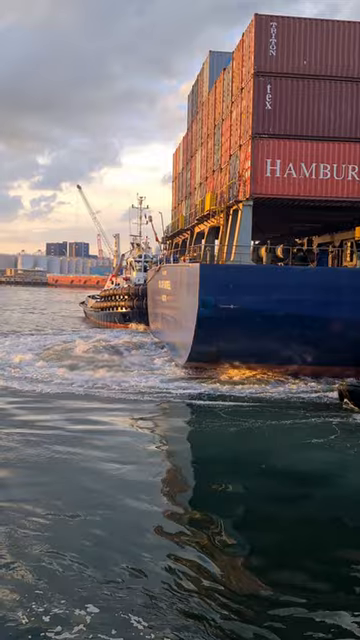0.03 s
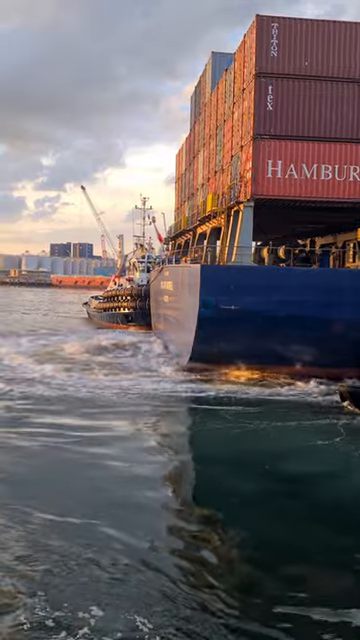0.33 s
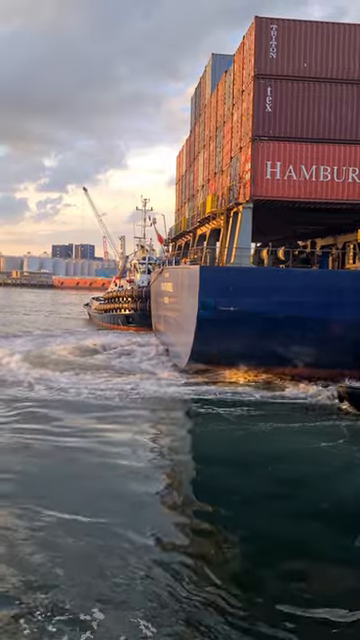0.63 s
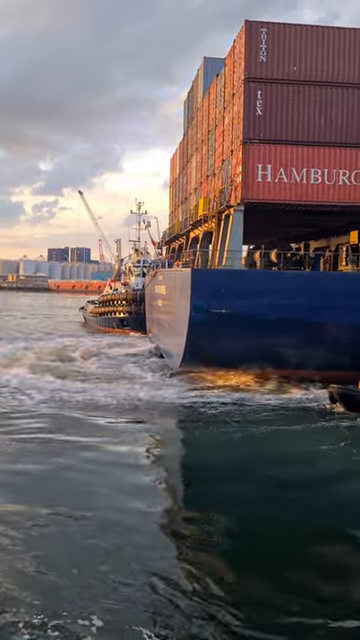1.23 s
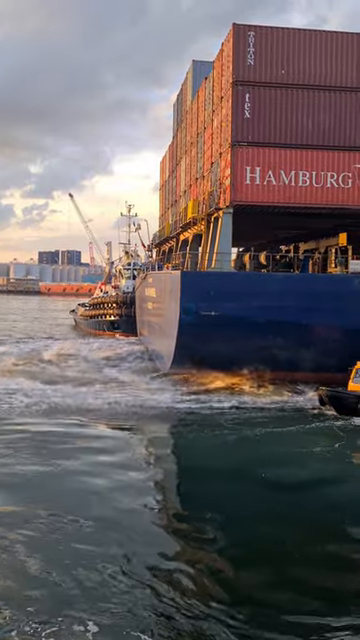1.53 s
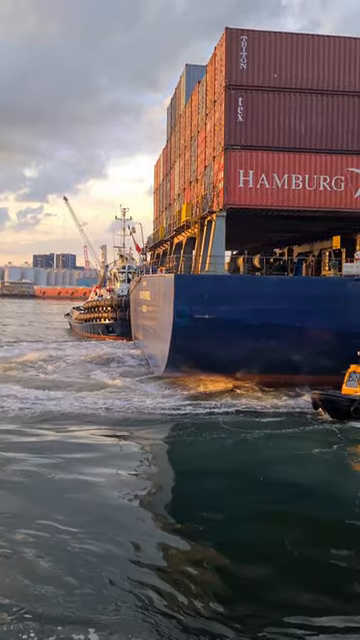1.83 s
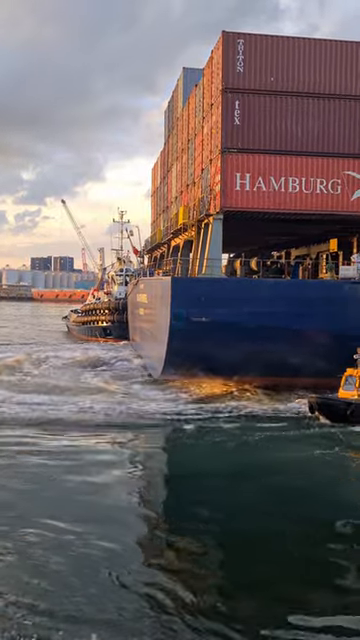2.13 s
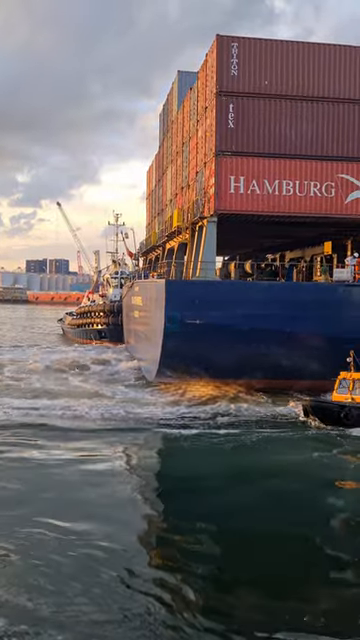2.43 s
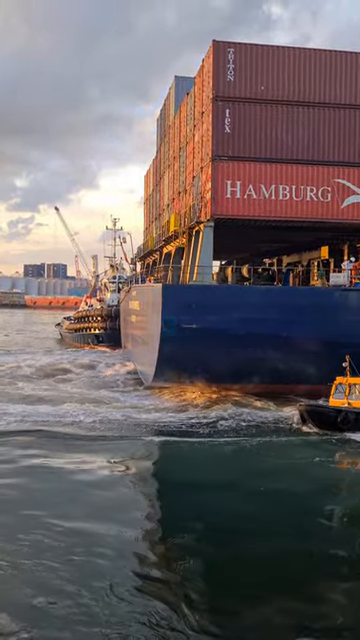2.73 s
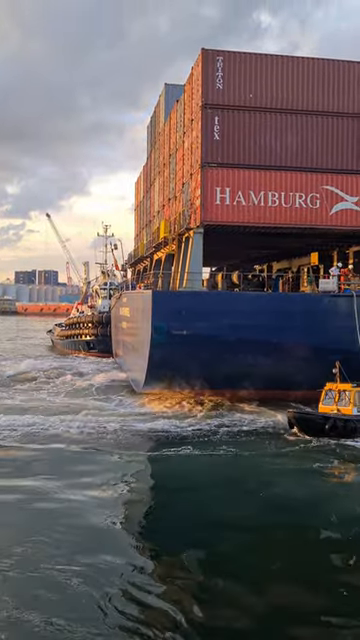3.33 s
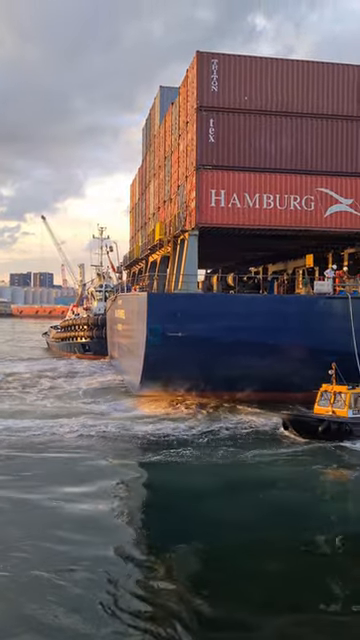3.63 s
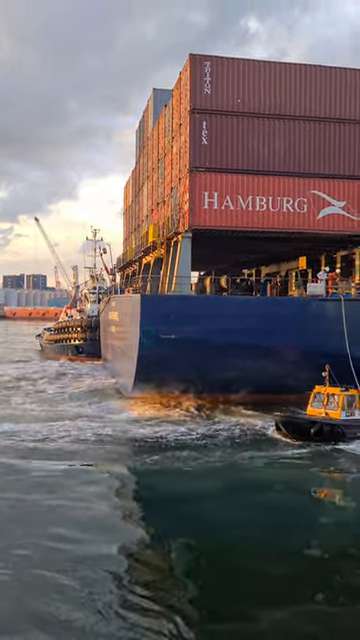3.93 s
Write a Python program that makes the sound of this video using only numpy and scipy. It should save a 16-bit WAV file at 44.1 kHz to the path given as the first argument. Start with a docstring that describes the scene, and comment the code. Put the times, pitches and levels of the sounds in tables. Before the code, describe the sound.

A deep, pulsing rumble of tug and container ship engines carries over open water, along with a whine and churning foam. One distant metallic clank rings out before the middle, and faint squeaks come and go.

```python
"""Two ship diesels throb across a harbour basin as a tug manoeuvres a container ship.
Running at different speeds, they beat against each other over a deep rumble, heavy exhaust
thuds and a machine whine. The propeller wash roars and fizzes with foam, crests and droplets.
In the distance steel strikes steel once and rings on, and a few faint squeaks carry over."""
import sys
import numpy as np
from scipy import signal
from scipy.fft import rfft, irfft
from scipy.io import wavfile

SR = 44100
rng = np.random.default_rng(int(sys.argv[2]) if len(sys.argv) > 2 else 0)


def unload_audio(sound):
    """Save the sound as a 16-bit wav file, at the path given as the first command line argument."""
    columns = np.transpose(np.atleast_2d(sound))
    # keep every value between -1 and 1, then stretch to whole-number steps
    steps = np.round(np.clip(columns, -1, 1) * 32767)
    wavfile.write(sys.argv[1], SR, steps.astype(np.int16))


N = 176400
T = np.arange(N) / SR
HZ = np.maximum(np.arange(N // 2 + 1) * SR / N, 1)
SLOW_CYCLE_HZ, FAST_CYCLE_HZ = 6.006, 7.51  # working cycles of the two diesels


def diesels():
    """The exhausts of two engines drift in and out of step."""
    # exhaust harmonics of each engine: multiple of the cycle rate, level/dB
    slow_orders = [(5, -42), (6, -43), (10, -29.5), (11, -37.5), (14, -34), (15, -39.5), (16, -35.5),
                   (17, -49), (20, -46), (21, -46), (23, -49.5), (24, -41.5), (26, -60), (32, -46.5)]
    fast_orders = [(7, -45), (9, -40), (10, -40.5), (11, -37), (17, -39.5), (20, -46), (23, -46.5),
                   (25, -52.5), (26, -50), (35, -46), (36, -57), (42, -46), (44, -45.5), (45, -55),
                   (51, -58), (53, -52.5), (54, -48), (55, -47.5)]
    slow = exhaust(SLOW_CYCLE_HZ, slow_orders, stroke_s=3.1995)
    return slow + exhaust(FAST_CYCLE_HZ, fast_orders, stroke_s=3.2005)


def exhaust(cycle_hz, orders, stroke_s):
    """Harmonics gather into one thump per cycle, one of them at stroke_s; high ones line up loosely."""
    return sum(tone(k * cycle_hz, db, align_s=stroke_s, smear_rad=.005 * k * cycle_hz)
               for k, db in orders)


def clatter(firings_per_cycle=9, depth=.74):
    """Engine noise pulses with the firings of both diesels."""
    # clatter spectrum: f/Hz, level/dB
    colour = [(15, -110), (150, -67), (300, -76.5), (450, -63.5), (700, -75.5), (1100, -96), (2500, -88),
              (5000, -110), (16000, -130)]
    # its swells and dips: t/s, level/dB
    ride = [(.15, 2), (.6, 2.5), (.9, 3), (1.15, -9), (1.7, 5), (2.2, -3), (2.55, -1), (2.9, 4.5),
            (3.3, -6), (3.7, -9), (4, 3)]
    firing = sum(np.cos(2 * np.pi * firings_per_cycle * hz * T) for hz in (SLOW_CYCLE_HZ, FAST_CYCLE_HZ))
    return noise(at_hz(colour)) * np.exp(depth * (firing - 1)) * from_db(over_time(ride))


def thuds(boom_hz=55):
    """A heavy stroke makes the exhaust boom for a few cycles."""
    # heavy strokes: t/s, half-width/s, level/dB
    strokes = [(0.2, .035, -24), (0.535, 0.01, -23), (0.698, 0.028, -20), (1.656, 0.018, -19),
               (1.866, 0.018, -20), (2.401, .018, -20), (2.539, 0.015, -25), (3.07, 0.037, -23),
               (3.195, 0.028, -16.5), (3.329, .032, -19), (3.537, 0.018, -18), (3.733, .025, -30)]
    return sum(-from_db(db) * swell(s, width) * np.cos(2 * np.pi * boom_hz * (T - s))
               for s, width, db in strokes)


def hums():
    """Other machinery hums; the lowest four tones beat into a deep throb."""
    # machinery tones: f/Hz, level/dB
    tones = [(51.2, -33.5), (52.8, -31), (53.7, -37.5), (54.8, -38.5), (118.6, -45.5), (148.5, -47),
             (205.6, -43.5)]
    # swell of the rumble, weaker on tones above 60 Hz: t/s, level/dB
    ride = [(.15, 2.5), (.65, -3), (1.1, -5), (1.5, 4), (2, -8), (2.4, 0), (2.85, -3), (3.25, -3),
            (3.6, 3.5), (4, -10)]
    return sum(tone(hz, db + over_time(ride) * min(1, 60 / hz)) for hz, db in tones)


def whine(pitch_hz=270.08):
    """Harmonics of a fast-turning machine; the higher ones flutter more."""
    # harmonics: multiple, level/dB, left minus right/dB
    harmonics = [(1, -60, 12), (2, -43.5, 0), (3, -50, -13), (4, -53.5, 14), (5, -56.5, -5), (6, -60, 3),
                 (7, -64, -9), (9, -62, 10)]
    # two of them fade as the paths over the water change: multiple -> t/s, level/dB
    fades = {2: [(.15, -2), (.38, 8), (.6, -4.5), (1, 3), (1.5, 2), (2.05, 6.5), (2.5, 2), (2.7, 0.5),
             (3.1, 1), (3.35, -10), (3.75, 4.5), (4, 0.5)], 3: [(.15, 9.5), (.62, 8.5), (.9, 1), (1.3, -2),
             (2.3, -6), (2.8, 2), (3.4, -6), (3.8, 4.5)]}
    out = 0
    for k, db, pan in harmonics:
        fade_db = over_time(fades[k]) if k in fades else 0
        flutter_db = 1.3 * np.sqrt(k) * drift(13)
        out += panned(pan) * tone(k * pitch_hz, db + fade_db + flutter_db, waver_db=1, waver_rad=.27)
    return out


def roar():
    """Water churned by the propeller roars along with the exhaust rumble."""
    # roar spectrum: f/Hz, level/dB
    colour = [(15, -34.5), (21, -79), (26, -50), (33, -65), (41, -62), (46, -62), (53, -45.5), (62, -52),
              (70, -40), (80, -50.5), (110, -46.5), (130, -54), (200, -53), (235, -56), (275, -53.5),
              (300, -57.5), (330, -55.5), (365, -63.5), (410, -56), (500, -69.5), (560, -64.5),
              (605, -72.5), (650, -66.5), (720, -67.5), (880, -72), (1080, -67.5), (1250, -74.5),
              (1400, -72.5), (2000, -78.5), (2600, -81), (3150, -81), (3900, -97.5), (6000, -104),
              (16000, -125)]
    # its gentle heave: t/s, level/dB
    ride = [(.15, 0.9), (.7, 0.5), (1.2, -.3), (1.7, -0.2), (2.3, 0.2), (2.75, -0.6), (3.1, 0.5), (3.5, 0),
            (4, -.5)]
    return noise(at_hz(colour), patchy_db=1) * from_db(over_time(ride) + .5 * drift(1.7))


def foam():
    """Foam hisses on the wash, easing off unevenly."""
    # hiss spectrum: f/Hz, level/dB
    colour = [(15, -125), (1000, -107), (2000, -84), (2600, -78), (3200, -81), (4000, -85.5), (5000, -90),
              (6100, -89.5), (7900, -100), (9100, -100), (11900, -93), (13200, -94), (15500, -96.5)]
    # its ebb: t/s, level/dB
    ride = [(.15, 0.5), (.45, -1.5), (.75, -0.5), (1, -3), (1.37, 0.5), (1.58, -2), (2.1, -2.5),
            (2.5, -2.5), (3.4, -4.5), (4, -4)]
    return noise(at_hz(colour), patchy_db=.35) * from_db(over_time(ride))


def crests(band_hz=570):
    """Each breaking crest is a short, grainy surge of spray."""
    # small crests of the wash: t/s, half-width/s, f/Hz, level/dB
    breaks = [(.82, .05, 3100, -48), (1.22, .05, 2900, -48), (1.38, .08, 3100, -48),
              (1.735, .04, 3000, -48), (2.88, .018, 1900, -46), (3.35, .05, 2700, -51),
              (3.81, .05, 3050, -47)]
    grain = from_db(1.5 * drift(100))
    return grain * sum(swell(s, width) * ringing([(hz, band_hz, db)]) for s, width, hz, db in breaks)


def splashes(per_s=110, pitches=14, ring_cycles=17, level_db=-58.5):
    """Small bubbles and droplets ring for a few cycles each."""
    out = np.zeros((2, N))
    for hz in np.geomspace(900, 6000, pitches):
        onsets = rng.random(N) < per_s / pitches / SR
        clicks = onsets * from_db(6 * np.minimum(rng.exponential(1, N), 4))
        r = from_db(-60 * hz / (ring_cycles * SR))  # decay per sample
        w = 2 * np.pi * hz / SR
        plinks = signal.lfilter([np.sin(w) / np.sqrt(hz)], [1, -2 * r * np.cos(w), r * r], clicks + 1e-18)
        out += panned(rng.normal(0, 5.7)) * plinks
    return from_db(level_db) * out / out.std()


def clank(attack_s=.0015, echo_db=-16.5, echo_s=.049, tail_rise_s=.021, tail_decay_s=.12):
    """Steel strikes steel in a quick run of hard contacts, smeared by echoes; the steel rings on."""
    # contacts: t/s, level/dB, decay/s, brightness/(dB per octave)
    contacts = [(1.596, -11, .008, -.3), (1.604, -7, .007, -1.5), (1.614, 3, .005, -2.2),
                (1.62, 1.5, .0035, -.5), (1.6335, 1.5, .009, .7), (1.657, -8, .005, .3)]
    # impact spectrum: f/Hz, level/dB
    colour = [(15, -96), (300, -62), (700, -56.5), (1000, -55), (1500, -67.5), (2000, -68.5), (2600, -65.5),
              (3400, -70), (4200, -73.5), (6000, -84.5), (9000, -89.5), (13000, -92), (16000, -87)]
    # steel resonances in the strike and in the tail: f/Hz, width/Hz, level/dB
    strike_modes = [(1035, 130, -34), (1380, 27, -38), (1980, 70, -38), (3240, 170, -37.5), (6400, 54, -62)]
    tail_modes = [(695, 61, -38.5), (824, 33, -42), (1077, 44, -40), (1446, 30, -47), (2350, 36, -47)]
    out = 0
    for s, db, decay, tilt in contacts:
        age = np.maximum(T - s, 0)
        rise = np.minimum(age / attack_s, 1)
        fall = np.exp(-age / decay) + from_db(echo_db) * np.exp(-age / echo_s)
        steel = noise(at_hz(colour) + tilt * np.log2(HZ / 1500)) + ringing(strike_modes)
        out += from_db(db) * rise * fall * steel
    age = np.maximum(T - contacts[0][0], 0)
    tail = np.minimum(age / tail_rise_s, np.exp((tail_rise_s - age) / tail_decay_s))
    return out + tail * ringing(tail_modes)


def squeaks(sag_per_s=.3):
    """Short rough tones far off swell, sag in pitch and fade."""
    # squeaks and groans: t/s, half-width/s, f/Hz, level/dB, left minus right/dB
    cues = [(.23, .04, 645, -44, 0), (1.14, .07, 935, -46, 0), (2.15, .06, 1080, -42, 4),
            (2.23, .06, 1060, -42, 4), (2.31, .025, 1090, -45, 4), (2.395, .03, 1075, -42.5, 4),
            (2.95, .025, 680, -47, -2), (3.12, .1, 665, -43, -1), (3.12, .04, 1668, -46, 4)]
    out = 0
    for s, width, hz, db, pan in cues:
        t = T - s
        phase = 2 * np.pi * hz * (t - .5 * sag_per_s * t ** 2) + drift(24)
        envelope = from_db(db + 3.5 * drift(30)) * np.exp(-2 * (t / width) ** 2)
        out += panned(pan) * envelope * np.sqrt(2) * np.sin(phase)
    return out


def tone(hz, db, waver_db=.7, waver_rad=.12, align_s=0, smear_rad=2 * np.pi):
    """A tone that wavers in level and phase on its way over the water."""
    phase = 2 * np.pi * hz * (T - align_s) + smear_rad * rng.standard_normal() + waver_rad * drift(4.3)
    return -np.sqrt(2) * from_db(db + waver_db * drift(1.1)) * np.cos(phase)


def noise(db_per_hz, patchy_db=0, bands=16):
    """Coloured stereo noise, wider in the treble; patchy_db lets each band swell and sink by itself."""
    # stereo lean: f/Hz, left minus right/dB
    balance = [(60, -4.5), (87, 0), (130, 2), (180, -1), (260, -2), (380, 4.5), (550, 2.5), (790, -0.5),
               (1140, 4), (1650, 1.5), (2380, -3), (3440, 0), (4970, 2), (7180, 11), (10400, -5),
               (15000, -11)]
    # likeness of left and right: f/Hz, correlation
    likeness = [(30, 1), (60, 1), (130, 1), (260, 0.94), (500, 0.68), (1000, 0.43), (2000, 0.29),
                (3000, 0.53), (4200, 0.13), (15000, 0.12)]
    mid, side = rfft(rng.standard_normal((2, N)))
    alike = np.clip(at_hz(likeness), 0, 1)
    pair = mid + np.sqrt((1 - alike) / (1 + alike)) * side * [[1], [-1]]
    pair *= panned(at_hz(balance)) * from_db(db_per_hz) * np.sqrt(SR / 2)
    if not patchy_db:
        return irfft(pair, N)
    band = at_hz([(60, 0), (16000, bands - 1)])
    return sum(irfft(pair * np.maximum(1 - abs(band - k), 0), N) * from_db(patchy_db * drift(22))
               for k in range(bands))


def ringing(modes):
    """Noise held in resonances."""
    power = sum(from_db(db) ** 2 / width / (1 + ((HZ - hz) / width) ** 2) ** 2 for hz, width, db in modes)
    return noise(10 * np.log10(power + 1e-20))


def drift(rate_hz):
    """A random wander with spread 1, mostly slower than rate_hz."""
    slow = irfft(rfft(rng.standard_normal(N)) / (1 + (HZ / rate_hz) ** 2), N)
    return (slow - slow.mean()) / slow.std()


def swell(s, width):
    """A smooth rise and fall around a moment."""
    return np.exp(-np.minimum(((T - s) / width) ** 2, 60))


def panned(db):
    """Left and right gains for a level difference, at constant power."""
    gains = from_db(np.array([[.5], [-.5]]) * db)
    return gains / np.sqrt(np.mean(gains ** 2, axis=0))


def at_hz(points):
    """A curve over log frequency, read at every bin."""
    hz, value = np.transpose(points)
    return np.interp(np.log(HZ), np.log(hz), value)


def over_time(points):
    """A curve over time, read at every sample."""
    return np.interp(T, *np.transpose(points))


def from_db(db):
    """Decibels to gain."""
    return 10 ** (np.asarray(db) / 20)


def scene():
    """Machinery and propeller wash, with the clank and squeaks behind them."""
    machinery = diesels() + hums() + clatter() + thuds() + whine()
    wash = roar() + foam() + crests() + splashes()
    return machinery + wash + clank() + squeaks()


def record(dry, start_s=.121, low_cut_hz=21, high_cut_hz=15700):
    """The sound starts after a moment of silence; the lowest bass and the top are cut."""
    trimmed = irfft(rfft(dry) / np.sqrt(1 + (low_cut_hz / HZ) ** 12), N)
    padded_hz = np.arange(N + 1) * SR / (2 * N)
    high_cut = np.clip((high_cut_hz - padded_hz) / 200 + .5, 0, 1)
    return irfft(rfft(trimmed * (T >= start_s), 2 * N) * high_cut)[:, :N]


dry = scene()
out = record(dry)
unload_audio(out)
```